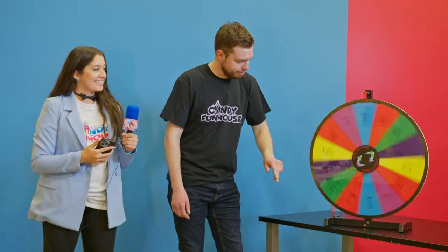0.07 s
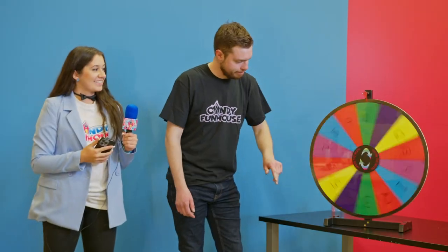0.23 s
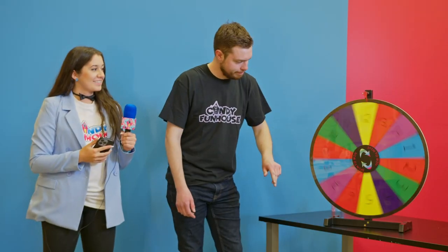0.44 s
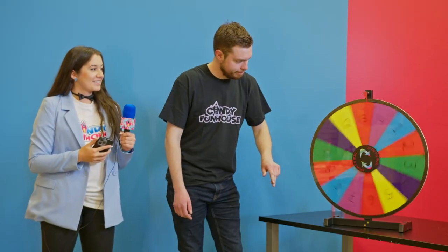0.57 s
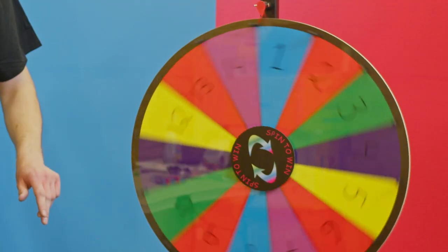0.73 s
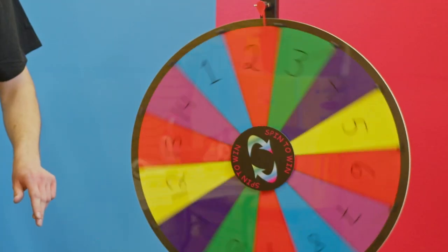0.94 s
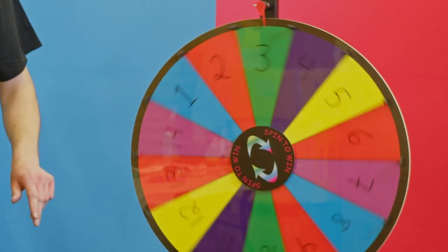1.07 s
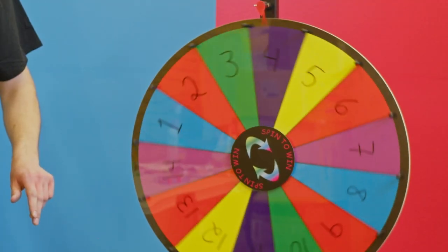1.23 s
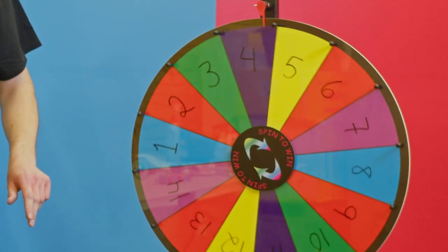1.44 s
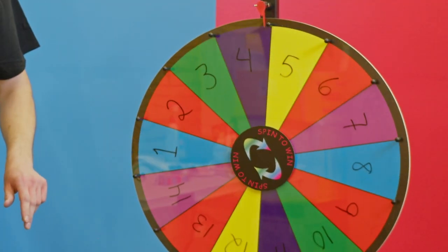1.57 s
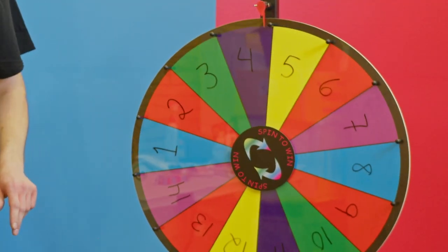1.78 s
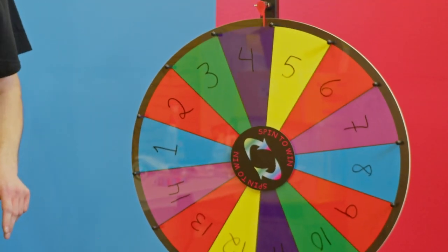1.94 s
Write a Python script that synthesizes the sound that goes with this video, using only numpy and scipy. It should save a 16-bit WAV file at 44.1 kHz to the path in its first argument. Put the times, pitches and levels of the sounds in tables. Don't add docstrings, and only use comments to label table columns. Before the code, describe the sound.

Sharp, chattering prize wheel clicks spread further apart and stop, leaving quiet buzzing room tone.

```python
import sys
import numpy as np
from scipy import signal
from scipy.fft import rfft, irfft, next_fast_len
from scipy.io import wavfile
from scipy.ndimage import uniform_filter1d

SR = 44100
rng = np.random.default_rng(int(sys.argv[2]) if len(sys.argv) > 2 else 0)


def gain_from_db(level_db):
    decades = np.asarray(level_db, float) / 20
    return 10 ** decades


def unload_audio(sound):
    columns = np.transpose(np.atleast_2d(sound))
    steps = np.round(np.clip(columns, -1, 1) * 32767)
    wavfile.write(sys.argv[1], SR, steps.astype(np.int16))


N = 88508
PAD = 4410
RELEASE_LEAD_S = 0.0022
WHEEL_RISE_S = 0.002

# [t/s, level/dB, first slap over level/dB, release tick over level/dB, wheel knock/dB]
SNAPS = [(-.0193, -12.5, 10, -9, 1), (0.0564, -12.5, 2, -12, -1), (0.1351, -11.5, 1, -15.5, -0.5),
         (0.2195, -12.5, 2.5, -7, -0.5), (0.3089, -11.5, -0.5, -28, -1), (0.4031, -12.5, -0.5, -29, -1),
         (0.5033, -11, 1, -34, -1.5), (0.6116, -12, 1, -12, -1), (0.7236, -12.5, -0.5, -41.5, -1),
         (0.8405, -12, -4, -16, -1.5), (0.9666, -11.5, -2, -11, -2.5), (1.1126, -14, 2.5, -9, -1),
         (1.3121, -11, 4.5, -15.5, -1)]


def unit(x):
    return x / np.sqrt(np.mean(x ** 2) + 1e-20)


def along(points, hz):
    f, value = np.transpose(points)
    return np.interp(np.log(hz + 1), np.log(f + 1), value)


def filtered(x, response):
    m = next_fast_len(len(x) + SR // 2)
    f = np.fft.rfftfreq(m, 1 / SR)
    return irfft(rfft(x, m) * response(f), m)[:len(x)]


def peak(f, hz, width_hz):
    return 1j * f * width_hz / (hz * hz - f * f + 1j * f * width_hz)


def resonances(f, modes):
    return sum((-1) ** k * gain_from_db(db) * peak(f, hz, width) for k, (hz, width, db) in enumerate(modes))


def add(track, s, sound):
    part = track[PAD + int(round(s * SR)):][:len(sound)]
    part += sound[:len(part)]


def flapper_contacts():
    # [delay t/s, level/dB]
    chatter = [(0, 0), (.0038, -1.5), (.0079, -4), (.0119, -5), (.0158, -6.5), (.0203, -8.5), (.0247, -6),
               (.0288, -8.5), (.034, -9), (.0376, -13), (.0448, -16), (.0492, -19), (.054, -21)]
    # [t/s, level/dB]
    touches = [(.0397, -25), (.1149, -27), (.2017, -30), (.290, -29), (.381, -28), (.4785, -33),
               (.4825, -31), (.5892, -35), (.6985, -31), (.7, -31), (1.1045, -38), (.816, -32),
               (.9415, -33), (1.081, -34), (1.2600, -42), (1.2631, -38), (1.3044, -40), (.399, -35),
               (.719, -35), (.8343, -39), (.3044, -32)]
    slap_t60_s, first_t60_s, touch_t60_s = 0.0065, 0.0025, 0.009
    jitter_s, scatter_db = 0.00015, 1.5
    touch_db, touch_gap_s, touch_loss_db = 5, 0.0033, 5

    hits = []
    for s, db, first_db, release_db, _ in SNAPS:
        hits.append((s, db + first_db, first_t60_s))
        hits.append((s - RELEASE_LEAD_S, db + release_db, slap_t60_s))
        for delay, loss_db in chatter[1:]:
            late, louder = rng.standard_normal(2)
            hits.append((s + delay + jitter_s * late, db + loss_db + scatter_db * louder, slap_t60_s))
    for s, db in touches:
        for k in range(2):
            hits.append((s + k * touch_gap_s, db + touch_db - k * touch_loss_db, touch_t60_s))
    return hits


def flapper():
    # [f/Hz, width/Hz, level/dB]
    strip_modes = [(4400, 1100, -44), (6500, 850, -6), (7456, 950, 2.5), (9160, 1520, -1.5),
                   (10270, 1620, -4), (12420, 1100, -8.5), (15540, 2440, -8)]
    flapper_db, low_cut_hz, rise_s = 5.5, 3260, 0.0003
    table_delay_s, table_db = 0.00095, -11

    track = np.zeros(N + PAD)
    t = np.arange(PAD // 5) / SR
    f = np.fft.rfftfreq(len(t), 1 / SR)
    ratio = f / low_cut_hz
    low_cut = (1j * ratio) ** 2 / (1 + 1.2j * ratio - ratio ** 2)
    strip = low_cut * resonances(f, strip_modes)
    table_bounce = 1 + gain_from_db(table_db) * np.exp(-2j * np.pi * f * table_delay_s)
    for s, db, t60 in flapper_contacts():
        envelope = gain_from_db(-60 * t / t60) * (1 - np.exp(-t / rise_s))
        burst = envelope * rng.standard_normal(len(t))
        slap = irfft(rfft(burst) * strip * table_bounce, len(t))
        add(track, s, gain_from_db(db + flapper_db) * slap / np.linalg.norm(slap))
    return track


def wheel(t60, roll_db):
    # [f/Hz, width/Hz, level/dB]
    disc_modes = [(166.7, 93, -1.5), (573, 110, -7.5), (826, 160, -5.5), (1053, 170, -3.5),
                  (1840, 420, -5.5), (2222, 130, 0), (3180, 900, -5), (3733, 180, 2.5), (4660, 880, -1.5)]
    knock_gain_db, roll_fade_db_per_s = -4.5, 6
    stop_s, stopping_s = 1.5, 0.21

    t = np.arange(SR // 8) / SR
    clock = (np.arange(N + PAD) - PAD) / SR
    turning = np.clip((stop_s - clock) / stopping_s, 0, 1)
    roll_level = gain_from_db(roll_db - roll_fade_db_per_s * clock) * turning
    track = roll_level * rng.standard_normal(N + PAD)
    for s, *_, knock_db in SNAPS:
        envelope = gain_from_db(-60 * t / t60) * (1 - np.exp(-t / WHEEL_RISE_S))
        shake = envelope * rng.standard_normal(len(t))
        add(track, s - RELEASE_LEAD_S, gain_from_db(knock_gain_db + knock_db) * shake / np.linalg.norm(shake))
    return filtered(track, lambda f: resonances(f, disc_modes))


def thud():
    # [f/Hz, level/dB, t60/s]
    hollow_notes = [(783, -47.5, 0.12), (853, -48, 0.13), (1797, -48.5, 0.064), (2269, -47, 0.096),
                    (187, -55.5, 0.11)]
    track = np.zeros(N + PAD)
    t = np.arange(SR // 5) / SR
    for s, *_, knock_db in SNAPS:
        ring = np.zeros(len(t))
        for hz, db, t60 in hollow_notes:
            detuned_hz = hz * rng.normal(1, 0.014)
            ring += gain_from_db(db - 60 * t / t60) * np.sin(2 * np.pi * detuned_hz * t)
        add(track, s - RELEASE_LEAD_S, gain_from_db(knock_db) * (1 - np.exp(-t / WHEEL_RISE_S)) * ring)
    return track


def stand():
    # [t/s, level/dB]
    shake_levels = [(0.0, -59), (0.052, -55.5), (0.15, -68), (0.218, -51.5), (0.378, -64.5), (0.418, -55.5),
                    (0.698, -64), (0.738, -49.5), (0.842, -60), (0.864, -49), (1.1, -60), (1.176, -77),
                    (1.224, -66.5), (1.492, -65.5), (1.59, -91), (1.6, -77)]
    stand_hz, wander_hz = 114.9, 2.96
    s, db = np.transpose(shake_levels)
    wander = unit(uniform_filter1d(rng.standard_normal(N), size=SR // 20))
    phase = 2 * np.pi * np.cumsum(stand_hz + wander_hz * wander) / SR
    level = gain_from_db(np.interp(np.arange(N) / SR, s, db, right=-120))
    return level * np.sqrt(2) * np.sin(phase)


def room(x):
    # [f/Hz, t60/s]
    room_t60 = [(200, 1), (2000, 1), (5000, .85), (7500, 0.72), (10000, 0.51), (13000, 0.51), (16000, 0.22)]
    # [f/Hz, level/dB]
    room_colour = [(4500, 2.5), (5700, -4.5), (7500, -0.5), (9500, 1), (13000, 1), (16000, 0)]
    room_db, delay_s, early_db, early_t60_s = -9, 0.01, -2.5, 0.089

    wet = np.zeros(len(x) + 2 * SR)
    step = SR // 30
    for i in range(0, len(x), step):
        hz, t, z = signal.stft(rng.standard_normal(SR), SR, nperseg=256)
        late = gain_from_db(-60 * t / along(room_t60, hz)[:, None])
        early = gain_from_db(early_db - 60 * t / early_t60_s)
        tail = signal.istft(z * (late + early), SR, nperseg=256)[1]
        answer = signal.fftconvolve(x[i:i + step], tail / np.linalg.norm(tail))
        wet[i + int(delay_s * SR):][:len(answer)] += answer
    return filtered(wet[:len(x)], lambda f: gain_from_db(room_db + along(room_colour, f)))


def sleeve_and_bump():
    # [f/Hz, density/dB per Hz]
    cloth_spectrum = [(1500, -24.5), (3000, 1), (7500, -8), (12000, -10), (16000, -14)]
    rustle_s, rustle_db, rustle_t60_s = 1.934, -72.5, 0.92
    tick_db, tick_t60_s = -11.5, 0.016
    bump_s, bump_hz, bump_db, bump_t60_s = 1.94, 24.3, -41, 0.18

    t = np.arange(N) / SR
    u = np.clip(t - rustle_s, 0, None)
    v = np.clip(t - bump_s, 0, None)
    cloth = unit(filtered(rng.standard_normal(N), lambda f: gain_from_db(along(cloth_spectrum, f))))
    decay = gain_from_db(-60 * u / rustle_t60_s) + gain_from_db(tick_db - 60 * u / tick_t60_s)
    rustle = (u > 0) * gain_from_db(rustle_db) * decay * cloth
    bump = -gain_from_db(bump_db - 60 * v / bump_t60_s) * np.sin(2 * np.pi * bump_hz * v)
    return rustle + bump


def ballast():
    # [multiple of 120 Hz, rms level/dB]
    harmonics = [(1, -73.5), (2, -66.5), (3, -66.5), (4, -79), (5, -75.5), (6, -75.5), (7, -73.5),
                 (8, -85.5)]
    t = np.arange(N) / SR
    buzz = np.zeros(N)
    for k, db in harmonics:
        buzz += gain_from_db(db) * np.sqrt(2) * np.sin(2 * np.pi * (round(k) * 120 * t + rng.random()))
    return buzz


def air():
    # [f/Hz, density/dB per Hz]
    air_spectrum = [(15, -4), (28, 0), (95, -19.5), (250, -22.5), (900, -29), (1900, -32.5), (3500, -46.5),
                    (16000, -57.5)]
    noise = filtered(rng.standard_normal(N), lambda f: gain_from_db(along(air_spectrum, f)))
    return gain_from_db(-54.5) * unit(noise)


def scene():
    slaps = flapper()
    disc = wheel(t60=0.078, roll_db=-45)
    radiated_knock = wheel(t60=0.013, roll_db=-200)
    reverb = room(slaps + gain_from_db(7.5) * radiated_knock)
    prize_wheel = (slaps + disc + thud() + reverb)[PAD:]
    return (prize_wheel + stand() + sleeve_and_bump() + ballast() + air())[None]


def low_pass(x):
    return signal.sosfilt(signal.butter(12, 17000, fs=SR, output="sos"), x)


def record(dry):
    # [f/Hz, level/dB]
    mic_response = [(1100, 0), (1450, -2.5), (1900, -0.5), (4800, 0.5), (5700, 4.5), (6500, 2.5)]
    top_hz, over_top_db, slope_hz = 15950, -36, 90

    def response(f):
        shelf_db = over_top_db * (1 + np.tanh((f - top_hz) / slope_hz)) / 2
        return gain_from_db(along(mic_response, f) + shelf_db)

    return low_pass(filtered(dry[0], response)[None])


dry = scene()
out = record(dry)
unload_audio(out)
```